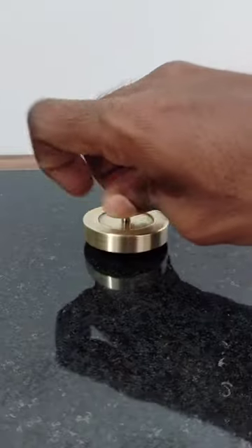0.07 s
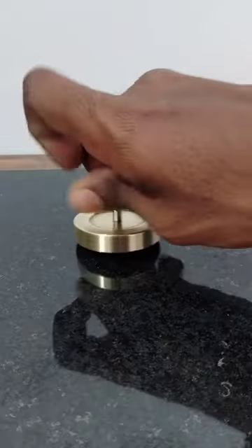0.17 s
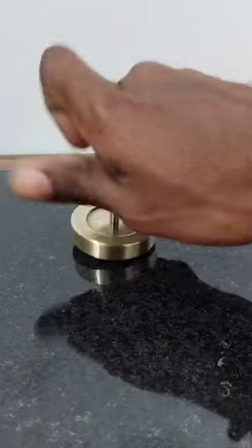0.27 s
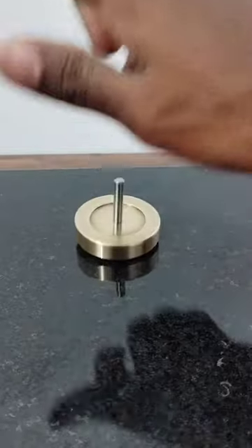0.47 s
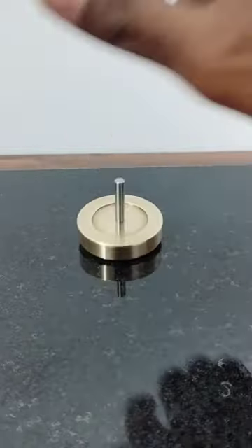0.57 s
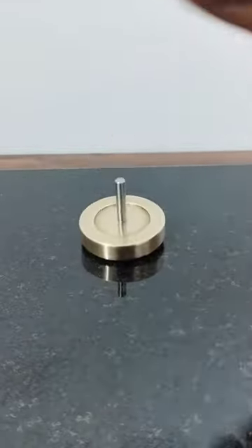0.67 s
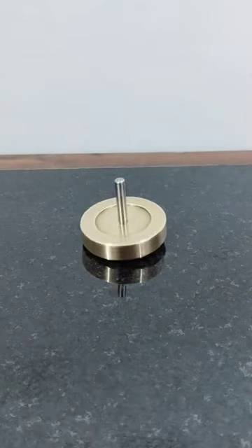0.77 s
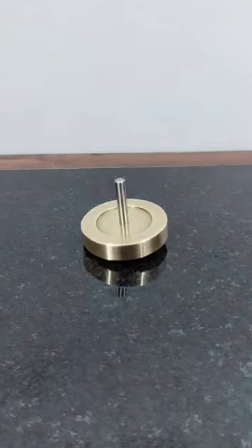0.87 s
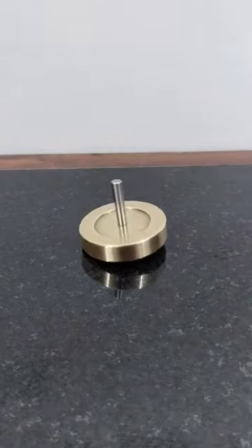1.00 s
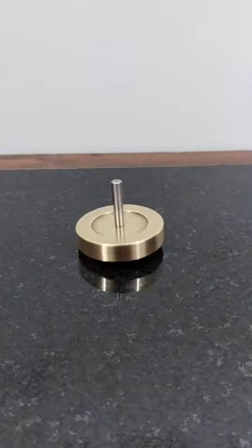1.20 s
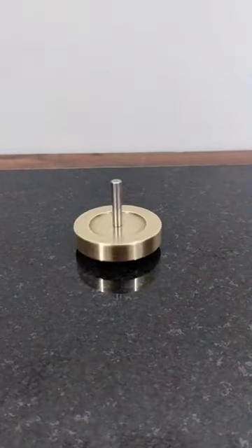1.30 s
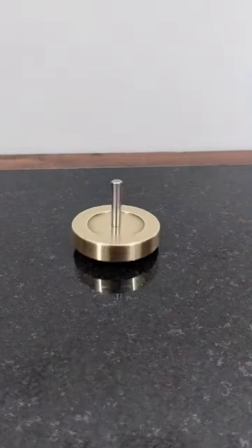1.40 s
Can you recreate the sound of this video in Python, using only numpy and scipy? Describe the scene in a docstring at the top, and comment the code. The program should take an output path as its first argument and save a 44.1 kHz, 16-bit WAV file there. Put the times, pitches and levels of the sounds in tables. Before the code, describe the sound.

Sharp clack and short rattle of a metal spinning top set off on polished stone.

```python
"""A faint rub of fingers, then a sharp clack: a small metal top is snapped into a spin on polished stone.
Its tip skips and chatters for a fifth of a second; the impacts excite the modes of top and slab,
and the metal rings with one thin, high note. A very faint, gently pulsing whirr near 830 Hz
begins before the clack and continues throughout.
A soft swish passes as the hand draws away, close by in a quiet room with a low hum."""
import sys
import numpy as np
from scipy import signal
from scipy.fft import rfft, irfft, next_fast_len
from scipy.io import wavfile

SR = 44100
rng = np.random.default_rng(int(sys.argv[2]) if len(sys.argv) > 2 else 0)


def pcm_store(signal):
    """Save signal as 16-bit PCM."""
    levels = np.round(np.clip(np.atleast_2d(signal), -1, 1) * 32767)
    wavfile.write(sys.argv[1], SR, levels.astype(np.int16).T)


N = 63945
T = np.arange(N) / SR
PAN = np.array([[.5], [-.5]])   # splits a left-minus-right difference between the channels

# Impacts of the tip. Each row: start in seconds, relative knock and tick levels in dB, tick centre in Hz.
TIP_IMPACTS = [(0.1978, -14, 0.5, 2690), (0.2000, -4.5, -2, 1300), (0.2068, 1, 10.5, 6150),
               (0.2098, -9, 2, 3400), (0.2169, -9.5, -17.5, 1860), (0.2343, -26, -10, 2200),
               (0.2513, -5, -3.5, 1720), (.2595, -12, -8, 1690), (0.2746, -9.5, -7, 1600),
               (0.2832, -16, 1, 2880), (0.2891, -2.5, 3.5, 2090), (0.2949, -21, 0, 3620),
               (0.3000, 0.5, -13, 1550), (.333, -14.5, -16, 2510), (0.355, -11.5, -28, 1590),
               (.371, -18.5, -46, 1600), (.387, -36, -26, 1630)]
# Force of the chatter between impacts. Each row: time in seconds, relative level in dB.
CHATTER_FORCE = [(.196, -46), (.203, -26), (.216, -5), (.245, 2), (.258, 3), (.267, 1.5), (.285, -4.5),
                 (.305, 0.5), (.32, -9), (.335, -7.5), (.365, -16.5), (.39, -36), (.47, -53)]
# Modes of top and slab together. Each row: frequency in Hz, gain in dB, 60 dB decay time in seconds,
# change of gain in dB once the fingers let go.
BODY_MODES = [(609, -13.5, 0.091, -14), (829, -3, 0.049, -9.5), (860, -10, 0.1, 3),
              (912.7, 0.5, 0.044, 1.5), (1106, -17.5, 0.043, 14), (1176, -13, .1, 7.5),
              (1427, -4.5, 0.057, -0.5), (1514, -1.5, 0.061, -3), (1585, -3, 0.035, -13),
              (2310, -6.5, 0.0328, 0), (2775, -18, 0.036, -3), (2881, -6, 0.03, -2), (2952, -10, 0.065, 6),
              (3108, -28, 0.032, -5), (3646, -17, 0.024, 6.5), (4260, -20.5, .03, 3),
              (4384, -10.5, .028, 0), (4550, -17.5, .03, -2), (4860, -12, .028, -6),
              (5530, -20.5, 0.16, 7.5), (6120, -26, .06, 8.5), (6880, -17.5, 0.04, 2),
              (7186, -9.5, .03, -15)]
# Spectrum of the crack of each contact. Each row: frequency in Hz, relative level in dB.
CRACK_SPECTRUM = [(100, -18), (350, -36), (600, -7), (1000, 11), (1300, 9.5), (1600, 9), (2000, 7),
                  (2300, 9.5), (2620, 1.5), (3000, 2), (3400, -7), (3750, -7.5), (4500, -1.5), (5700, -9),
                  (7200, -13.5), (8500, -9.5), (10000, -26), (12000, 2), (13500, -38.5)]
# The thin note, pulled sharp while the tip skids. Each row: time in seconds, frequency in Hz.
NOTE_GLIDE = [(.197, 12090), (.205, 12200), (.216, 12240), (.235, 12370), (.262, 12220), (.283, 12080),
              (.301, 12074), (.42, 12000)]
# Spectrum of the faint whirr. Each row: frequency in Hz, relative level in dB.
WHIRR_SPECTRUM = [(400, -30), (600, -14.5), (750, -14.5), (810, 5.5), (900, -1.5), (990, -22.5),
                  (1500, -20), (3000, -45), (8000, -57.5)]
# Spectrum of the shuddering table. Each row: frequency in Hz, relative level in dB.
SHUDDER_SPECTRUM = [(30, -15), (50, -15), (70, 4), (110, -3), (190, -1.5), (270, -18), (500, -13),
                    (1500, -66)]
# Spectrum of the fingers rubbing the stem. Each row: frequency in Hz, relative level in dB.
GRIP_SPECTRUM = [(100, -32), (280, -10.5), (460, -0.5), (650, -16), (1500, -13.5), (4000, -28),
                 (13000, -30)]
# Spectrum of the withdrawing hand. Each row: frequency in Hz, relative level in dB.
SWISH_SPECTRUM = [(300, -1), (1000, 5.5), (2500, 2), (4300, 4.5), (6500, 0), (9000, -2), (13500, -8)]
# Spectrum of the room air. Each row: frequency in Hz, relative level in dB.
AIR_SPECTRUM = [(25, -18.5), (45, -8), (70, -1), (115, -1.5), (200, -6.5), (280, -17), (600, -17),
                (1200, -22.5), (2500, -27.5), (6000, -31), (13000, -34.5)]
# Partials of the room hum. Each row: frequency in Hz, level in dB.
HUM_PARTIALS = [(72.5, -77), (100, -75.5), (129.5, -77), (138.5, -69.5)]
# Likeness of the noise at left and right. Each row: frequency in Hz, correlation coefficient.
COHERENCE = [(30, .8), (150, 0.61), (300, 0.74), (800, 0.062), (3000, 0), (14000, 0.08)]
# Stereo image of the clatter. Each row: frequency in Hz, left minus right in dB, left lead in radians.
CLATTER_IMAGE = [(212, 4, 4.5), (654, -3, 3.5), (857, -7.5, 0.5), (1146, -7, 2.5), (1520, -6.5, 1.5),
                 (2000, -1, 4), (2523, 2.5, -2), (3100, 6, 2.1), (4420, 5.5, 0.5), (5800, 0.5, 4),
                 (6560, 5, 4), (11850, 3, 2.5)]


def strikes():
    """Impulsive contact: the force of each impact is a dull knock plus a hard, gritty tick."""
    knock_hz, tick_octaves, grit_s = 1214, 2.22, 0.0012
    edge_ratio = 2 ** (tick_octaves / 2)
    knocks, ticks = np.zeros((2, N))
    for start, knock_db, tick_db, tick_hz in TIP_IMPACTS:
        impulse = np.maximum(1 - np.abs(T - start) * SR, 0)
        grit = rng.standard_normal(N) * (T >= start) * np.exp(-np.abs(T - start) / grit_s)
        knocks += from_db(knock_db) * impulse
        tick = from_db(tick_db) * (impulse + from_db(-9) * grit) / 2
        ticks += cut(cut(tick, tick_hz / edge_ratio, "high"), tick_hz * edge_ratio, "low")
    return from_db(-38) * (2 * cut(knocks, knock_hz, "low") + ticks)


def chatter():
    """Shot noise: the force of the skidding tip is a Poisson train of small touches."""
    touches_per_s, spread_db = 1600, 2.5
    touching = rng.random(N) < touches_per_s / SR
    contour_db = np.interp(T, *np.transpose(CHATTER_FORCE), left=-200, right=-200)
    sizes = from_db(-56 + contour_db + spread_db * rng.standard_normal(N))
    touches = cut(touching * sizes * rng.choice([-1, 1], N), 3100, "low", order=1)
    return cut(touches, 940, "high", order=1)   # light touches hardly stir the lowest modes


def top_and_slab(force):
    """Modal superposition: the tip force drives damped modes, and each contact adds a noisy crack."""
    let_go_s, let_go_takes_s, crack_t60_s = 0.282, 0.0099, 0.05
    released = np.clip((T - let_go_s) / let_go_takes_s, 0, 1)
    ringing = np.zeros(N)
    for hz, db, t60, change_db in BODY_MODES:
        mode = np.sin(2 * np.pi * hz * T) * decay(T, t60)
        ringing += convolve(force * from_db(db + released * change_db), mode)
    energy_decay = decay(T, crack_t60_s) ** 2
    contact_energy = convolve(force ** 2, energy_decay / energy_decay.sum())
    grit = np.sqrt(np.abs(contact_energy)) * rng.standard_normal(N)
    crack = shaped(grit, lambda hz: from_db(25 + at_hz(CRACK_SPECTRUM, hz)))
    low_hz, high_hz = 572, 11850   # the small body radiates little outside this range
    return cut(cut(ringing + crack, low_hz, "high", order=4), high_hz, "low", order=10)


def thin_note():
    """Beating: a high, gliding mode of the metal interferes with a twin of steady pitch."""
    twin_hz, rasp_hz, flutter_hz, flutter_db = 12050, 450, 35.6, 2.7
    pitch_hz = np.interp(T, *np.transpose(NOTE_GLIDE))
    gliding = from_db(-36.5) * swell(start_s=0.196, rise_s=0.013, hold_s=0, t60_s=0.27)
    gliding *= np.sin(2 * np.pi * np.cumsum(pitch_hz) / SR)
    twin = from_db(-49) * swell(start_s=0.196, rise_s=0.0016, hold_s=0, t60_s=0.64)
    twin *= np.sin(2 * np.pi * twin_hz * T)
    rasp = 1 + from_db(-34) * wander(rasp_hz)
    return (gliding * rasp + twin) * from_db(flutter_db * wander(flutter_hz))


def squeak(hz=2315):
    """Stick-slip friction: the sliding tip gives one short tone."""
    envelope = swell(start_s=0.2307, rise_s=0.0015, hold_s=0.012, t60_s=0.013)
    return from_db(-41) * envelope * np.sin(2 * np.pi * hz * T)


def table_shudder():
    """Forced vibration: the launch shakes the table into a brief, low rumble."""
    envelope = swell(start_s=0.186, rise_s=0.013, hold_s=0.13, t60_s=0.4)
    return from_db(-58.5) * envelope * noise(SHUDDER_SPECTRUM)


def whirr():
    """Amplitude modulation: a very faint, narrow band of noise near 830 Hz pulses gently."""
    start_s, pan_db = 0.077, -9
    pulse_hz, pulse_db, peak_s = 7.3, 2, 1.046
    level_db = -81 + pulse_db * np.cos(2 * np.pi * pulse_hz * (T - peak_s))
    return from_db(level_db) * (T > start_s) * noise(WHIRR_SPECTRUM) * from_db(pan_db * PAN)


def hand():
    """Friction noise: the fingers rub the stem; a broadband swish follows as the hand draws away."""
    grip = from_db(-74.5) * decay(T - 0.076, t60_s=0.96) * noise(GRIP_SPECTRUM)
    withdrawal = swell(start_s=0.6306, rise_s=0.027, hold_s=0.0058, t60_s=0.59)
    return grip + from_db(-64) * withdrawal * noise(SWISH_SPECTRUM)


def stereo_image(x):
    """Directional cues: level and phase differ between left and right at each frequency."""
    def response(hz):
        level_db, lead_rad = at_hz(CLATTER_IMAGE, hz), at_hz(CLATTER_IMAGE, hz, column=2)
        return from_db(PAN * level_db) * np.exp(1j * PAN * lead_rad)
    return shaped(x, response)


def reverberation(x, t60_s, delay_s=0.006):
    """Diffuse field: dense reflections form a decaying tail of unit energy, unrelated left and right."""
    delayed = np.interp(T - delay_s, T, x, left=0)
    tails = rng.standard_normal((2, N)) * decay(T, t60_s)
    return np.array([convolve(delayed, tail / np.linalg.norm(tail)) for tail in tails])


def background():
    """Ambient noise: room air lies under a low hum whose neighbouring partials beat."""
    hum = sum(from_db(db) * np.sin(2 * np.pi * (hz * T + rng.random())) for hz, db in HUM_PARTIALS)
    return from_db(-68.5) * noise(AIR_SPECTRUM) + hum


def noise(spectrum):
    """Partial coherence: coloured stereo noise of rms 1, most alike left and right in the bass."""
    mid, side = rng.standard_normal((2, N))
    mid = shaped(mid, lambda hz: from_db(at_hz(spectrum, hz)) * np.sqrt(1 + at_hz(COHERENCE, hz)))
    side = shaped(side, lambda hz: from_db(at_hz(spectrum, hz)) * np.sqrt(1 - at_hz(COHERENCE, hz)))
    return unit_rms(np.array([mid + side, mid - side]))


def wander(hz):
    """Random modulation: low-passed noise of rms 1."""
    return unit_rms(cut(rng.standard_normal(N), hz, "low"))


def swell(start_s, rise_s, hold_s, t60_s):
    """Transient envelope: linear rise, hold, exponential decay."""
    return np.clip((T - start_s) / rise_s, 0, 1) * decay(T - start_s - rise_s - hold_s, t60_s)


def decay(t, t60_s):
    """Exponential damping: unity until t = 0, then 60 dB down every t60_s."""
    return np.exp(-np.log(1000) * np.maximum(t, 0) / t60_s)


def convolve(x, impulse_response):
    """Convolution: the response of a linear system to x."""
    return signal.fftconvolve(x, impulse_response)[:N]


def cut(x, hz, kind, order=2):
    """Maximally flat filtering, low-pass or high-pass."""
    return signal.sosfilt(signal.butter(order, hz, kind, fs=SR, output="sos"), x + 1e-18)


def shaped(x, response):
    """Spectral multiplication by a response given as a function of Hz."""
    size = next_fast_len(2 * N)
    hz = np.arange(size // 2 + 1) * SR / size
    return irfft(rfft(x, size) * response(hz), size)[..., :N]


def at_hz(table, hz, column=1):
    """Interpolation of a table column on a log-frequency axis."""
    rows = np.array(table)
    return np.interp(np.log(hz + 1e-9), np.log(rows[:, 0]), rows[:, column])


def from_db(db):
    """Amplitude ratio of a level in decibels."""
    return 10 ** (np.asarray(db) / 20)


def unit_rms(x):
    """Normalisation to rms 1."""
    return x / np.sqrt(np.mean(x ** 2) + 1e-30)


def scene():
    """Superposition: the top and its reflections add to the table, the whirr, the hand and the room."""
    note_pan_db = 12.5
    clatter = top_and_slab(strikes() + chatter()) + squeak()
    note = thin_note()
    early = from_db(-9.5) * reverberation(clatter, t60_s=0.16)   # from the slab and the near wall
    near = stereo_image(clatter + early) + note * from_db(note_pan_db * PAN)
    bright_clatter = clatter + from_db(-1.5) * cut(clatter, 6200, "high", order=1)
    far = from_db(-21) * reverberation(bright_clatter, t60_s=0.7)
    far += from_db(-19.5) * reverberation(note, t60_s=0.16)   # air absorbs the high note sooner
    return near + far + table_shudder() + whirr() + hand() + background()


def record(dry, cutoff_hz=14000):
    """Band limiting: a steep low-pass removes the highest treble."""
    return signal.sosfilt(signal.ellip(10, .1, 70, cutoff_hz, fs=SR, output="sos"), dry)


dry = scene()
out = record(dry)
pcm_store(out)
```